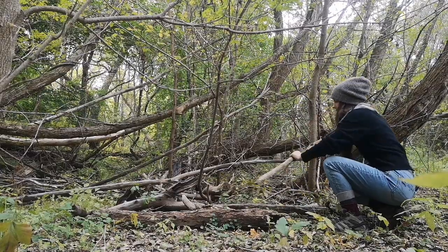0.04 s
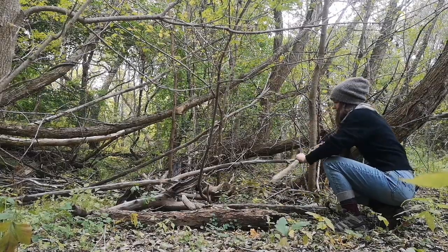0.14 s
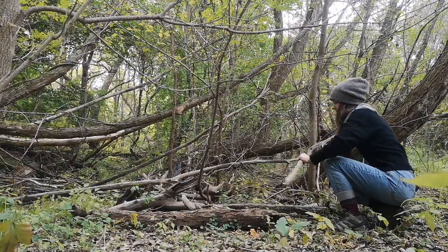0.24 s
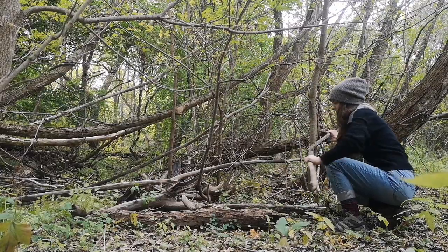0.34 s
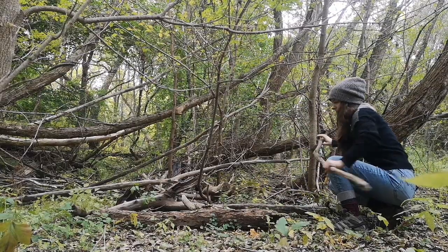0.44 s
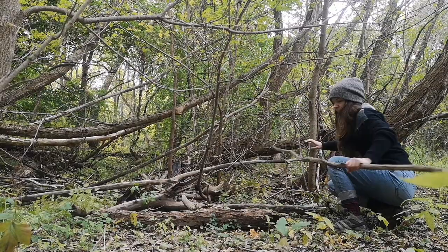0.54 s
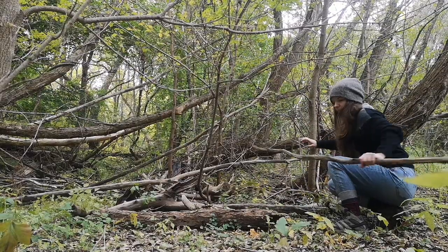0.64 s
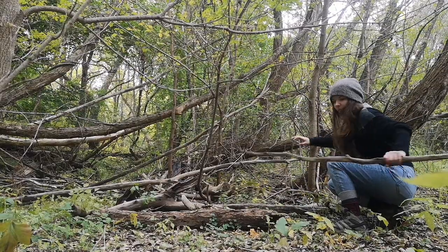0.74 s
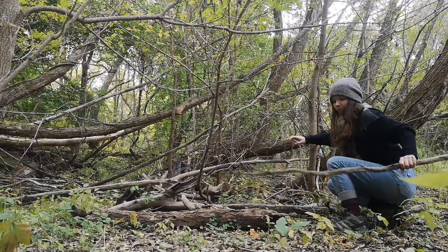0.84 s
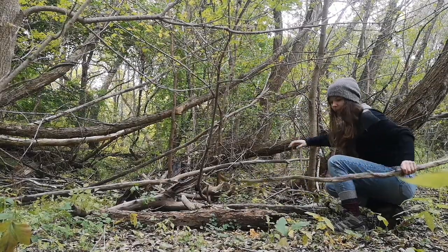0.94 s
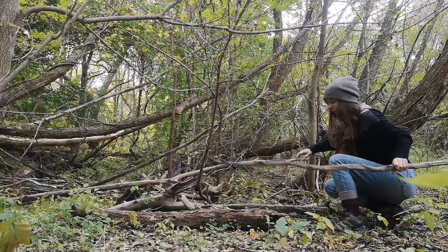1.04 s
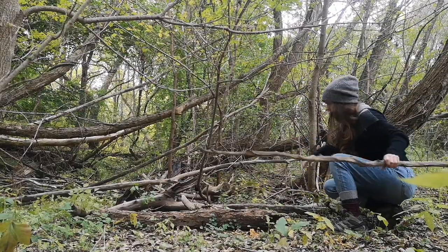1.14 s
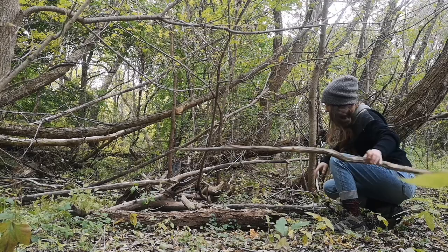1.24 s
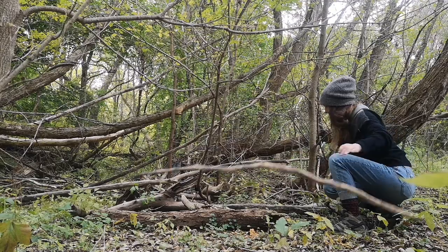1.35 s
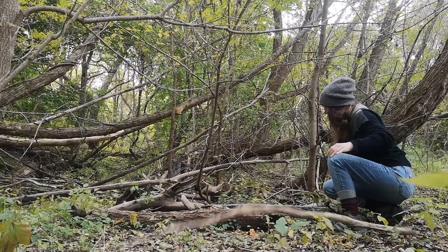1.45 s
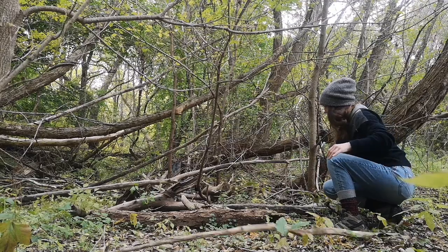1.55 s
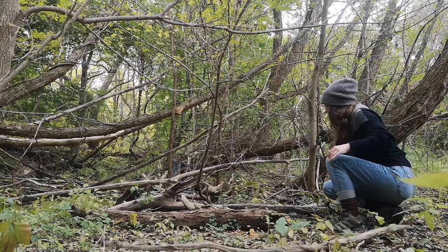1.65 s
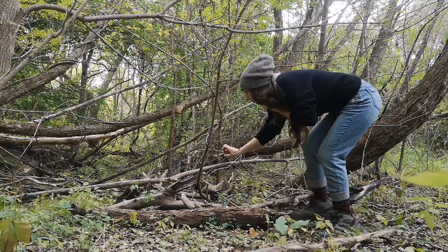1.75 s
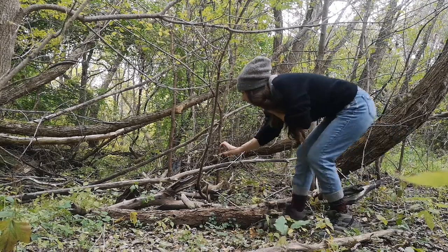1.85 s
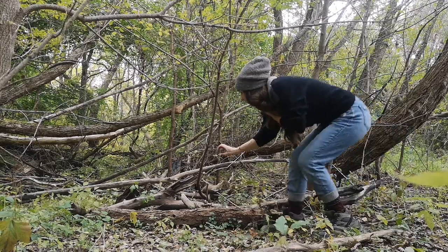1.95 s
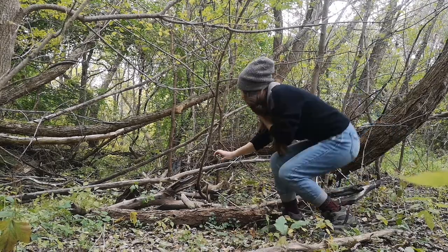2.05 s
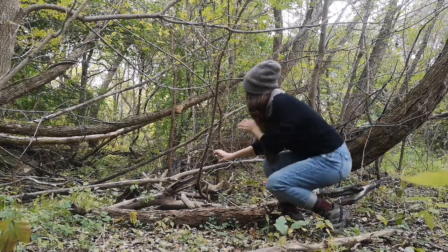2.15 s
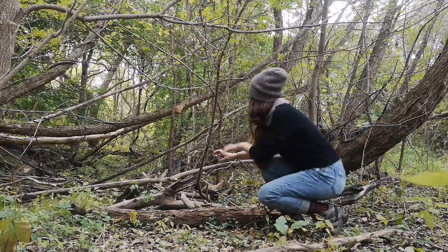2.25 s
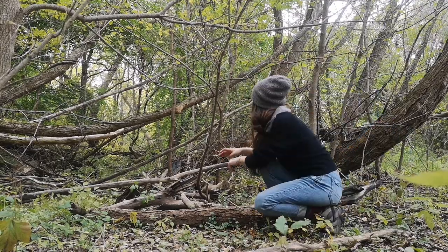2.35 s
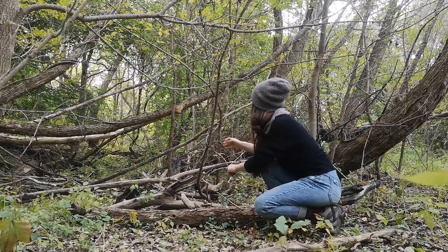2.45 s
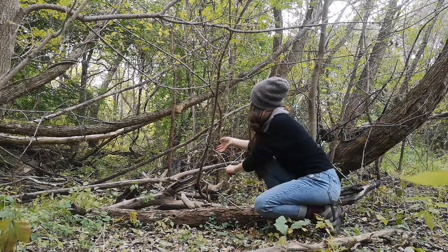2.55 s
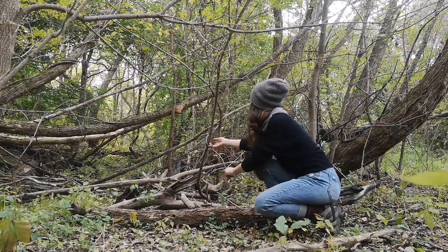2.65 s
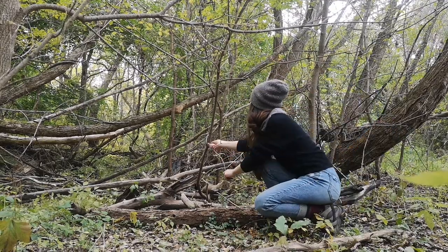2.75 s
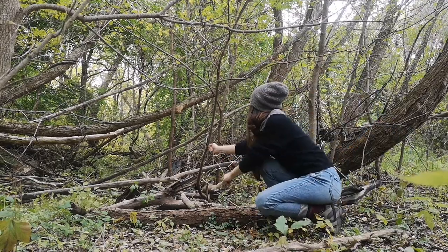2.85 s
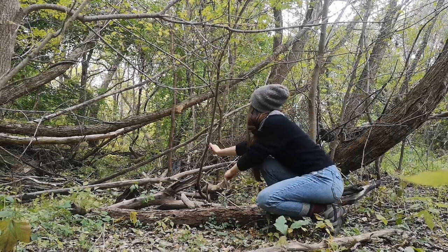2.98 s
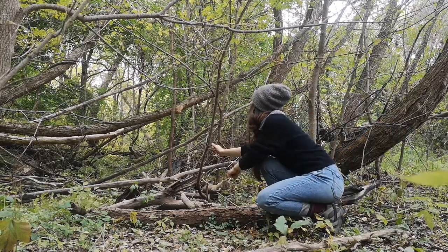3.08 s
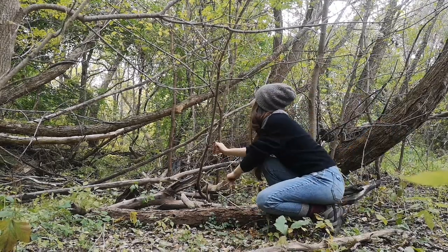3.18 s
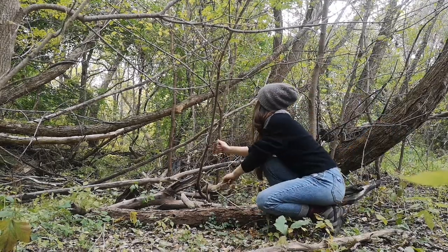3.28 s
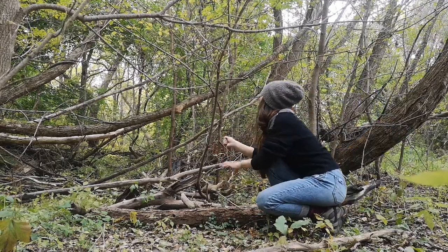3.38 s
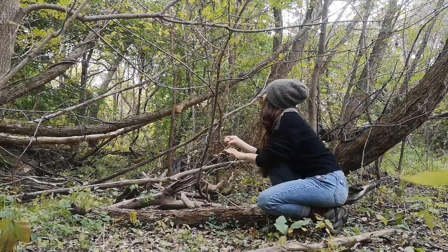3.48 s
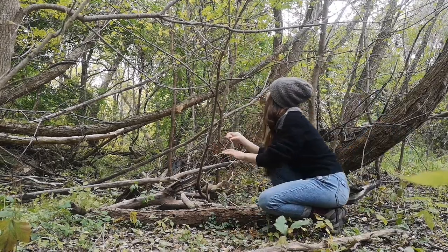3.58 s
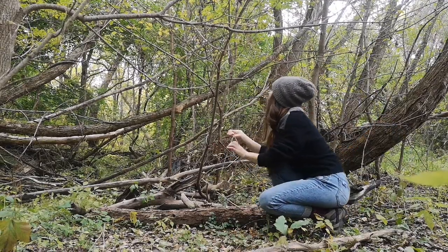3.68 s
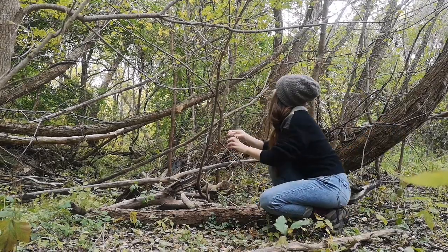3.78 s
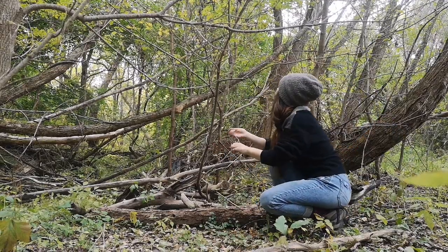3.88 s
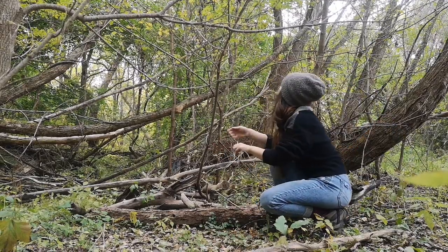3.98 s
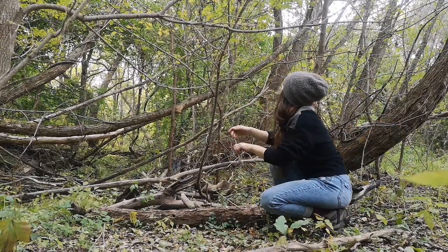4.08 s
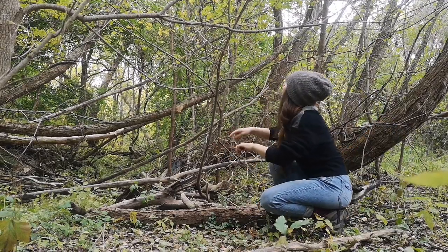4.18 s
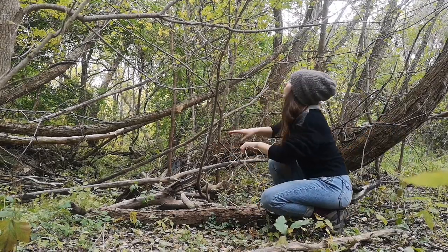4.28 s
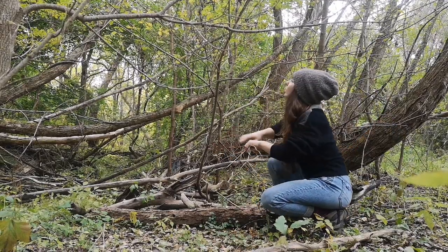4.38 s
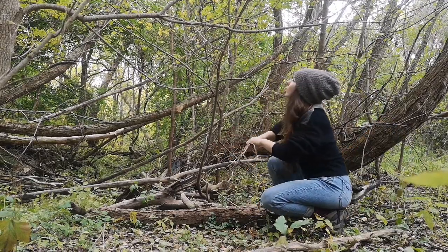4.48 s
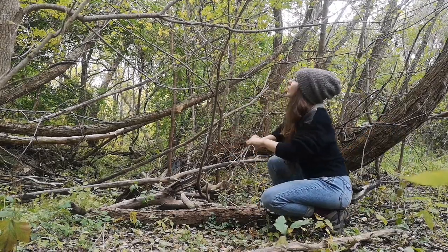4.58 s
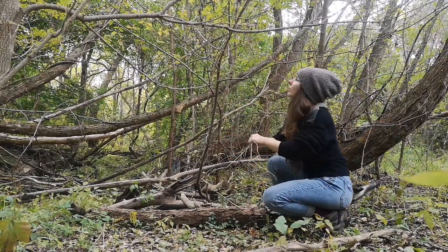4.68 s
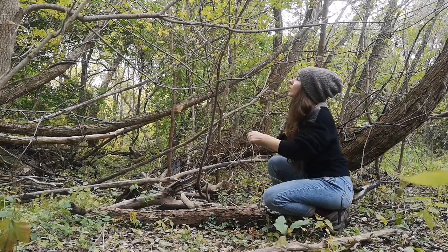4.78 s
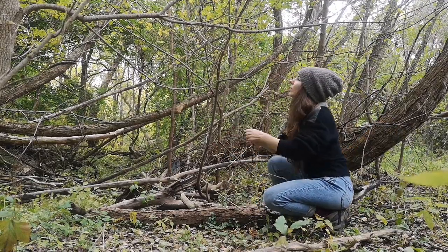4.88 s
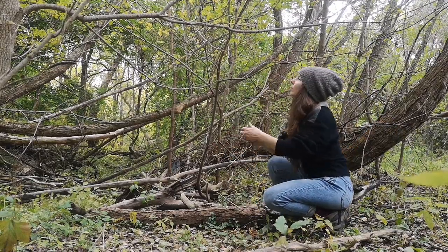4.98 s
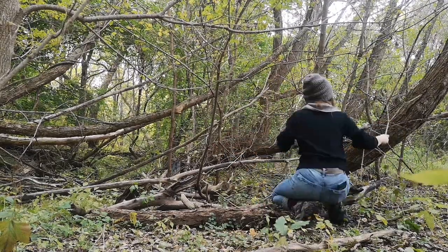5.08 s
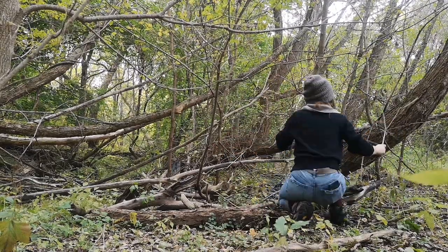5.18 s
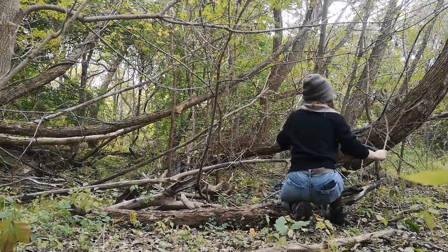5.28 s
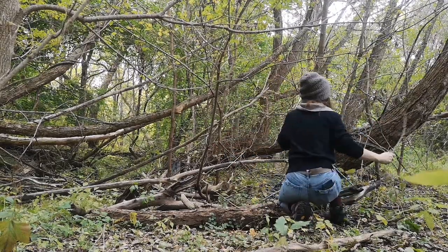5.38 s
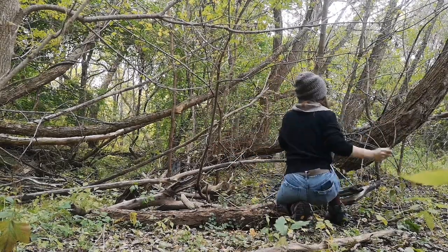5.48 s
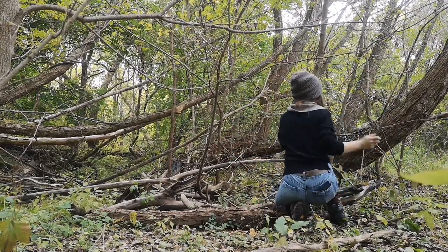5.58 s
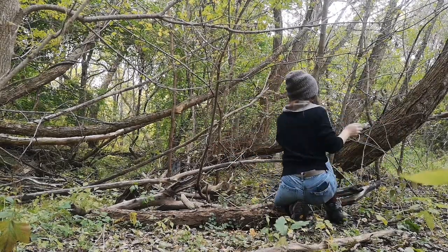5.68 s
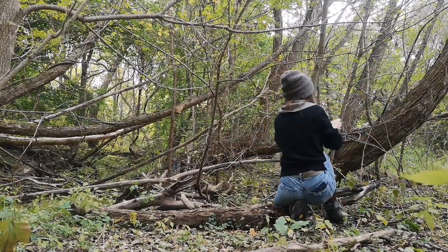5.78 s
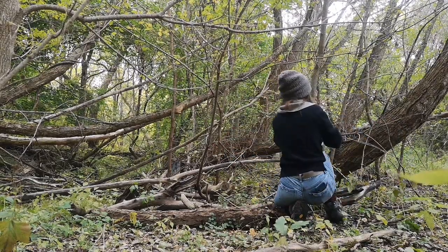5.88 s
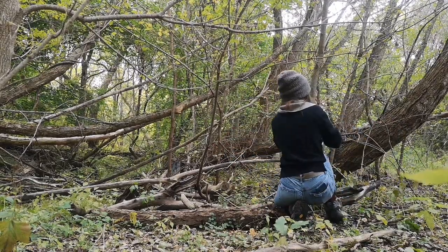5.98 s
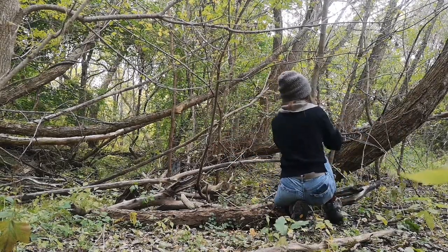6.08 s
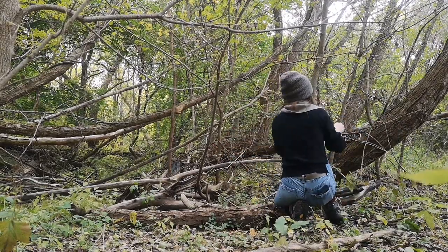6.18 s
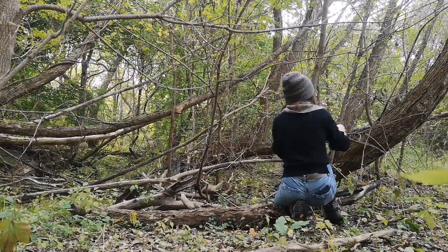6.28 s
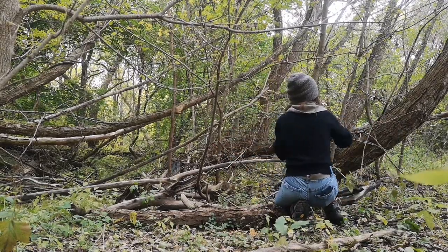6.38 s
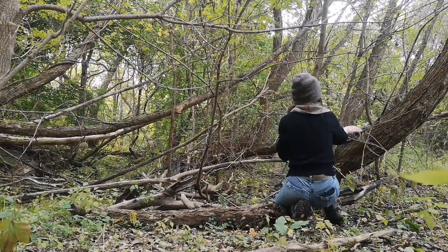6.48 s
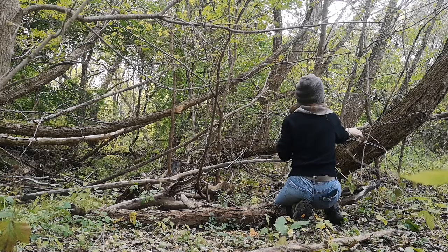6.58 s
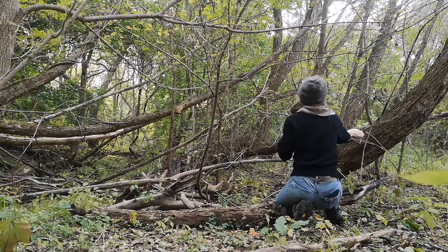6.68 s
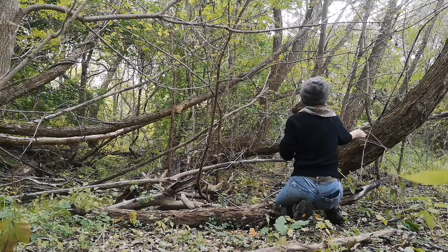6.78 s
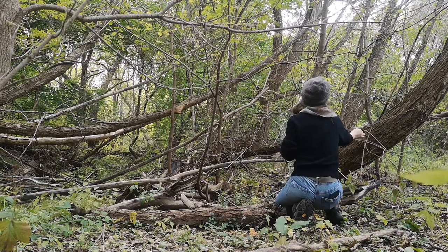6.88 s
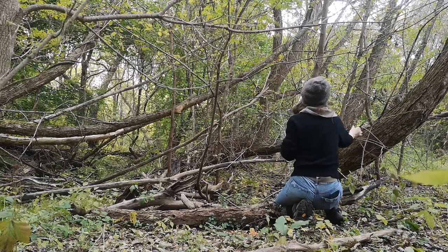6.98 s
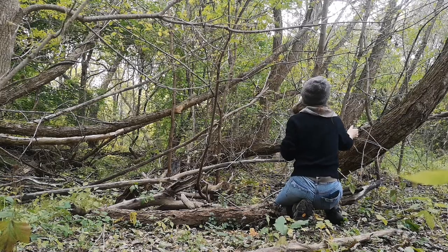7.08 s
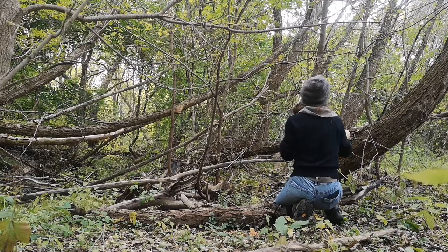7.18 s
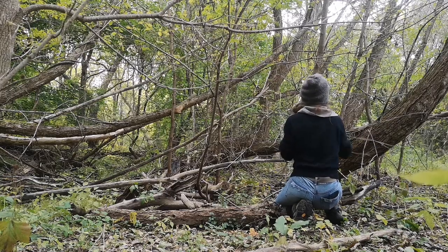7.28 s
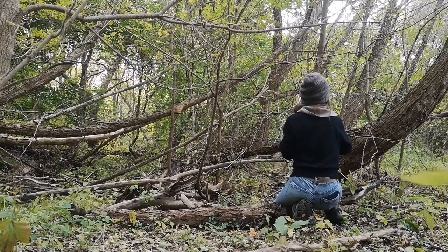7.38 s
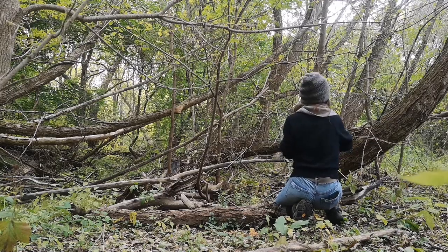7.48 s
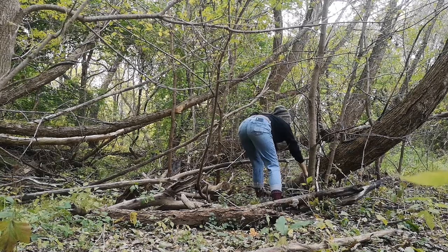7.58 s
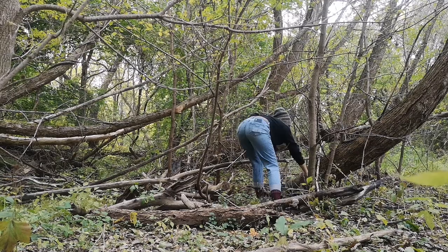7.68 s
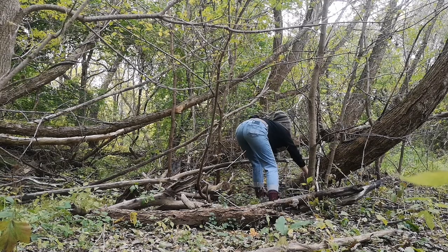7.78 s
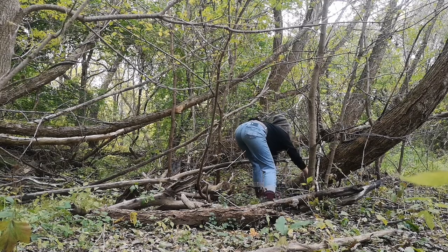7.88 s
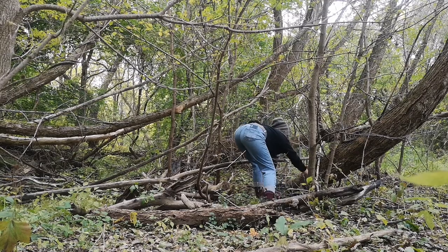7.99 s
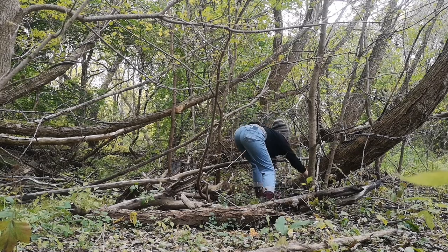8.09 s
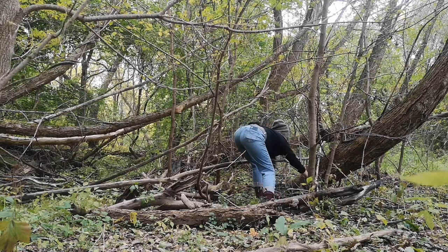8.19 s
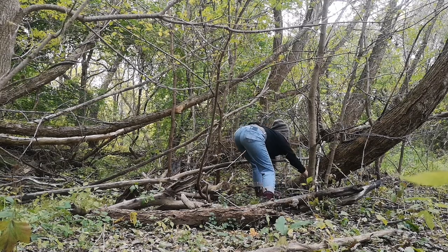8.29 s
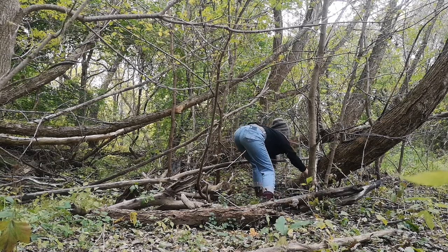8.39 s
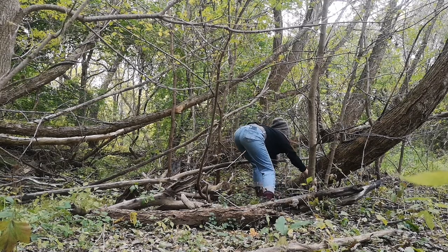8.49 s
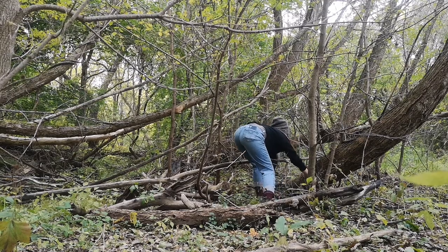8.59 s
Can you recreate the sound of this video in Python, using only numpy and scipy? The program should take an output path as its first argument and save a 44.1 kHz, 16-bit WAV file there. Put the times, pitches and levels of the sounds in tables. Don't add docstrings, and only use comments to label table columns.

```python
import sys
import numpy as np
from scipy import signal
from scipy.fft import rfft, irfft, next_fast_len
from scipy.io import wavfile
from scipy.ndimage import uniform_filter1d, map_coordinates

SR = 44100
rng = np.random.default_rng(int(sys.argv[2]) if len(sys.argv) > 2 else 0)


def gain_from_db(level_db):
    decades = np.asarray(level_db, float) / 20
    return 10 ** decades


def to_wav(s):
    ch = np.atleast_2d(s).T
    pcm = np.round(np.clip(ch, -1, 1) * 32767)
    wavfile.write(sys.argv[1], SR, pcm.astype(np.int16))


N = 381024
EDGE_HZ = 15320

# (start [s], end [s])
SHOTS = [
    (0, 1.729),
    (1.73, 5.028),
    (5.029, 7.55),
    (7.551, 8.64),
]
# (frequency [Hz], left over right [dB])
PORTS = [(3500, -0.5), (7000, -3.5), (10500, 0.5), (14000, 4.5)]


def unit(x):
    return x / np.sqrt(np.mean(x ** 2) + 1e-20)


def along(points, hz):
    f, v = np.transpose(points)
    return np.interp(np.log(hz + 1), np.log(f + 1), v)


def wobble(rate):
    knots = rng.standard_normal(int(N * rate / SR) + 4)
    return map_coordinates(knots, [np.arange(N) * rate / SR])


def filtered(x, response):
    m = next_fast_len(x.shape[-1] + 4096, real=True)
    return irfft(rfft(x, m) * response(np.fft.rfftfreq(m, 1 / SR)), m)[..., :x.shape[-1]]


def causal(x, spectrum):
    size = 4096
    gain = gain_from_db(along(spectrum, np.fft.rfftfreq(size, 1 / SR)))
    cepstrum = irfft(np.log(gain + 1e-4))
    cepstrum[1:size // 2] *= 2
    cepstrum[size // 2 + 1:] = 0
    kernel = irfft(np.exp(rfft(cepstrum)))[:size // 2]
    return signal.oaconvolve(x, kernel[None] / np.linalg.norm(kernel), axes=1)[:, :N]


def rush(spectrum, source):
    # (frequency [Hz], left-right likeness [-1 to 1])
    alike = [(60, 0.95), (130, 0.97), (290, 0.72), (640, 0.42), (1410, -0.42), (3100, 0.03),
             (15000, -0.074)]

    def response(hz):
        turn = np.arccos(np.clip(along(alike, hz), -1, 1)) / 2
        return (hz < EDGE_HZ) * gain_from_db(along(spectrum, hz)) * [np.cos(turn), np.sin(turn)]

    mid, side = filtered(source, response)
    return unit(np.array([mid + side, mid - side]))


def add(track, s, sound, pan_db=0, placed=True):
    left_leads = (.00014, -.00007, .00014, .00007)
    shot = np.searchsorted([end for _, end in SHOTS], s, side="right")
    keep = min(sound.shape[-1], int((SHOTS[shot][1] - s) * SR) - 20)
    stereo = np.broadcast_to(sound, (2, sound.shape[-1]))
    for port, side in enumerate((1, -1)):
        at = max(round((s - placed * side * left_leads[shot] / 2) * SR), 0)
        track[port, at:at + keep] += stereo[port, :keep] * gain_from_db(side * pan_db / 2)


def backdrop(axis):
    # (rumble [dB], tyre roar [dB], stirring leaves [dB], microphone hiss [dB], whine [dB])
    levels = [(-44.5, -53, -61, -64.5, -73), (-55, -64.5, -71, -75.5, -91), (-53, -61, -66.5, -67, -89),
              (-50.5, -61, -64, -67.5, -91)]
    shot = np.searchsorted([end for _, end in SHOTS[:-1]], np.arange(N) / SR)
    return np.transpose(levels)[axis][shot]


def road():
    # (time [s], level [dB])
    traffic = [(0, 0), (1.3, -1), (1.72, 0.5), (1.76, 0), (2.45, 0), (2.62, -4), (2.95, 1), (3.5, -1.6),
               (4.6, -1.5), (5.1, 1), (5.46, -1.5), (5.8, 1.8), (6.54, -0.7), (6.84, 1.2), (7.2, -0.2),
               (8.64, -1.5)]
    # (frequency [Hz], density [dB per Hz])
    rumble = [(8.8, -37.5), (15, -22), (32, -2.5), (45, -9), (65, -1), (222, -13.5), (276, -20.5),
              (308, -22.5), (400, -25.5), (520, -44.5), (880, -120)]
    # (frequency [Hz], density [dB per Hz])
    roar = [(150, -82), (250, -10), (322, -12), (455, -10.5), (884, -8), (1840, -14.5), (2070, -16),
            (4720, -23.5), (6000, -23), (7800, -35), (13200, -120)]
    # (start [s], end [s], first pitch [Hz], last pitch [Hz], level [dB])
    engines = [
        (0, 0.31, 59.6, 60.5, -47.5),
        (.42, 1.008, 60, 58.6, -48),
        (.94, 1.515, 233.5, 217, -60),
        (6.339, 7.55, 60.65, 60.9, -58.5),
        (6.851, 7.4, 91.1, 91.8, -56),
        (7.55, 8.61, 110.1, 119.9, -55.5),
        (7.8, 8.12, 203.4, 208.5, -61.5),
        (8.3, 8.647, 198.7, 199.5, -66),
        (8.099, 8.657, 286, 299.4, -66.5),
    ]
    swell_db = np.interp(np.arange(N) / SR, *np.transpose(traffic))
    rumble_db = backdrop(axis=0) + swell_db + 0.94 * wobble(4.01)
    roar_db = backdrop(axis=1) + 0.34 * swell_db + 0.28 * wobble(7.5)
    sound = gain_from_db(rumble_db) * rush(rumble, rng.standard_normal((2, N)))
    sound += gain_from_db(roar_db) * rush(roar, rng.standard_normal((2, N)))
    for start, end, first_hz, last_hz, db in engines:
        t = np.arange(0, end - start, 1 / SR)
        fade = np.clip(np.minimum(t, t[-1] - t) / .06, 0, 1)
        drift = np.interp(t, np.arange(90) / 9, rng.standard_normal(90))
        swell = np.interp(t, np.arange(90) / 8, rng.standard_normal(90))
        pitch_hz = first_hz + (last_hz - first_hz) * t / t[-1] + 2.42 * drift
        tone = np.sin(2 * np.pi * np.cumsum(pitch_hz) / SR)
        add(sound, start, fade * gain_from_db(db + 5.0 + 1.4 * swell) * tone)
    return sound


def patches(depth_db):
    crackle = rng.standard_normal((2, N)) * gain_from_db(0.64 * rng.exponential(size=(2, N)))
    z = signal.stft(crackle, nperseg=256)[2]
    field = uniform_filter1d(rng.standard_normal(z.shape[1:]), size=9, axis=0)
    field = uniform_filter1d(field, size=7, axis=1)
    return signal.istft(z * gain_from_db(depth_db * unit(field)), nperseg=256)[1][:, :N]


def flurries(rows, floor_db):
    db = np.zeros(N) + floor_db
    for s, peak_db, rise, hold, fall in rows:
        shot = [shot for shot in SHOTS if shot[0] <= s][-1]
        start, end = [round(edge * SR) for edge in shot]
        t = np.arange(start, min(end, N)) / SR
        below = np.maximum(np.maximum((s - t) / rise, (t - s - hold) / fall), 0)
        db[start:end] = np.maximum(db[start:end], peak_db - 20 * below)
    return db


def leaves():
    # (time [s], level [dB], rise [s], hold [s], fall [s])
    rustle = [(.24, -55, 0.73, 0.0068, 0.08), (.33, -53.5, .012, .01, 1.1), (.72, -53.5, .03, 0.071, 0.88),
              (1.24, -58.5, .04, 0.0085, .9), (1.445, -44, 0.0046, 0.06, 0.032),
              (1.646, -38, 0.15, .01, 0.14), (1.804, -51.5, 0.14, .12, 0.12), (2.15, -67.5, .1, 0.012, 2.4),
              (2.924, -55.5, 0.11, .01, 0.46), (3.3, -69, .15, .11, 0.19), (3.55, -70, .1, .01, 1.5),
              (4.97, -64.5, 0.52, .01, 0.2), (5.03, -52.5, .002, 0.28, .1), (5.28, -44, .012, .005, 0.17),
              (5.5, -62.5, .06, 0.57, 0.18), (5.925, -56, .04, .03, .08), (7.231, -53, .02, .003, .04),
              (7.304, -56.5, .025, .02, .06), (6.52, -62, .05, .01, 0.59),
              (6.765, -51.5, 0.042, 0.077, .03), (6.9, -46, 0.037, .005, 0.15), (6.95, -53, .04, .005, 0.3),
              (8.2, -44, 0.064, .005, 0.16), (8.63, -58, 1.3, .01, .1)]
    # (time [s], level [dB], rise [s],
    # hold [s], fall [s])
    shifts = [(1.47, -56, .02, .02, .08), (1.585, -50, .04, 0.028, .1), (1.66, -51, .04, 0.03, .1),
              (2.872, -52, .01, .01, .12), (2.95, -59, .05, 0.024, .12), (4.786, -62, .006, .004, .012),
              (4.835, -57, .006, .01, .06), (5.032, -62, .003, .21, .15), (5.29, -55, .02, .07, 0.11),
              (5.39, -63, .03, 0.018, .04), (5.925, -60, 0.04, .02, 0.12), (6.875, -61, .01, .01, 0.087),
              (7.72, -61, 0.009, .02, .08), (8.16, -59, .01, .02, .07)]
    # (time [s], level [dB], rise [s], hold [s], fall [s])
    crash = [
        (.205, -50, .06, .018, .05),
        (1.45, -44, 0.0094, .003, 0.045),
        (1.53, -47, 0.015, .003, 0.22),
        (1.65, -41, 0.061, 0.0062, 0.4),
        (1.95, -65.5, 0.55, 0.0041, 0.037),
    ]
    # (frequency [Hz], density [dB per Hz])
    fine = [(1470, -16.5), (2500, -10.5), (2890, -11.5), (4480, -11), (5630, -9.5), (6110, -8.5), (9000, 3),
            (11500, -5), (13700, -6), (15300, -10.5)]
    # (frequency [Hz], density [dB per Hz])
    litter = [(2400, -28.5), (3600, -3.5), (4600, -4), (6200, -2.5), (8000, -9), (12000, -35)]
    # (frequency [Hz], density [dB per Hz])
    stems = [(400, -12), (800, 2), (1600, 1.5), (2800, -4), (3300, -2), (3900, -30), (6500, -26)]
    flutter_db = 1.2 * wobble(14) + 1.4 * wobble(70)
    fine_db = flurries(rustle, backdrop(axis=2)) + flutter_db
    litter_db = flurries(shifts, floor_db=-104) + flutter_db
    stems_db = flurries(crash, floor_db=-104) + flutter_db
    sound = gain_from_db(fine_db) * rush(fine, patches(depth_db=2.0)) * gain_from_db([[.6], [-.6]])
    sound += gain_from_db(litter_db) * rush(litter, patches(depth_db=2.5))
    return sound + gain_from_db(stems_db) * rush(stems, patches(depth_db=3.5))


def grain(s):
    # (time [s], girth as extra bass [dB], hollow [Hz], length of the break t60 [s])
    wood = [(.211, -6, 5900, .05), (.312, 20.5, 3900, .04), (1.447, 2, 3600, 0.031),
            (1.5174, 15, 2970, 0.045), (1.5395, 3, 3950, 0.016), (2.7288, 1, 5630, 0.01),
            (2.8599, -3, 5060, 0.018), (3.0976, -14, 4070, 0.024), (3.895, -3, 4200, 0.01),
            (4.7737, -21, 1900, 0.0043), (4.8176, -1, 6300, 0.0086), (5.2743, -5, 3200, 0.015),
            (5.9276, 8, 3730, 0.012), (6.8591, -14, 4200, 0.011), (7.7111, 3, 2830, 0.013),
            (7.8365, 0, 5850, 0.014), (8.1502, 6, 4300, 0.019)]
    for when, girth_db, hollow_hz, t60 in wood:
        if abs(when - s) < .005:
            def colour(hz):
                octaves = np.log2((hz + 1) / hollow_hz)
                return -7.5 * np.exp(-(octaves / 0.29) ** 2) + along([(810, girth_db), (1900, 0)], hz)
            return colour, max(t60, .003)
    return lambda hz: 0 * hz, .026


def twigs():
    # (time [s], peak [dB], wood body [dB], scatter [dB], thinness [dB per octave])
    snaps = [(0.2135, -46, 5, -7.5, 4), (0.312, -36, -9.5, -1, -2), (1.447, -22, -7, -8.5, -1),
             (1.5171, -21, -14, -4.5, 3), (1.54, -11.5, -10, -12.5, -3.5), (2.729, -24, -26.5, -11.5, 3),
             (2.8598, -4, -26, -18.5, -3), (3.0975, -30.5, -36, -18, -7), (3.8956, -17.5, -28.5, -14, 7),
             (4.7738, -20, -23, -13, 5), (4.8177, -5.5, -31.5, -17.5, 3),
             (5.2742, -11.5, -31.5, -13.5, 1.5), (5.927, -44, -8.5, 1, -7), (6.8594, -6.5, -27, -10, 0.5),
             (7.7112, -18.5, -25, -6, -3), (7.8366, -24, -30, -8, 2), (8.149, -13, -22.5, -4.5, -1),
             (2.9312, -36.5, -18, -5.5, -5), (1.7144, -34, -4, -12, 19), (7.944, -48.5, -7, -15, -7)]
    # (time [s], peak [dB], scatter [dB], thinness [dB per octave])
    splinters = [(1.5523, -18.5, -2.5, 0.5), (2.8709, -14, -11, 0), (4.7565, -33, -23, 7),
                 (4.787, -46, -14, 14), (1.533, -38, -8, 5), (5.2954, -28, -10, -1), (5.3522, -28, -15, 0),
                 (5.389, -42, -31, -6), (6.7435, -56, -15, 0), (6.7611, -33, -11, -3),
                 (6.8658, -15, -12, 3), (7.7376, -28, -18, 6), (7.8524, -34, -3.5, 6), (8.133, -39, -9, 0),
                 (1.4615, -27, -14, 0), (1.4675, -30, -14, 4), (1.473, -32, -14, 0), (1.527, -24, -14, 0),
                 (1.5356, -26, -16, 0), (1.567, -22, -10, 0), (1.5865, -20, -12, 2), (1.6245, -32, -14, 6),
                 (1.6333, -27, -12, 6), (1.652, -29, -12, 6), (2.9525, -45, -12, -2),
                 (2.9713, -46, -12, -2), (4.734, -56, -20, 0), (4.763, -43, -20, 5), (4.795, -41, -16, 11),
                 (4.831, -27, -16, 5), (5.0295, -50, -12, 0), (5.0547, -43, -16, -2), (5.1835, -43, -16, 0),
                 (5.1975, -45, -16, 0), (5.2205, -45, -16, 0), (7.7175, -24, -10, -7),
                 (7.723, -23, -12, -5), (7.8423, -38, -14, 6), (8.1505, -15, -10, -5),
                 (8.2217, -40, -14, 0)]
    # (time [s], peak [dB], scatter [dB], thinness [dB per octave])
    touches = [(.145, -46, -1, 0), (.465, -42, -4, -4), (.5855, -43, -24, -12), (.707, -37, -2, -4),
               (1.265, -50, 1, 6), (2.2786, -38, -14, 9), (3.305, -52.5, -1, 5), (3.3906, -46, -12, -3),
               (3.4031, -43, -6, 0), (3.815, -60, 3, 3), (4.022, -51, -15, -1), (4.1285, -53, -8.5, -2),
               (4.4933, -42.5, -9, 0), (5.676, -41, -5, 3), (5.6944, -34, -8.5, 3), (6.489, -42, -11, 4),
               (6.504, -37, -7, -3), (7.0887, -44, -7, -7), (7.1331, -36, -22, 0), (7.229, -41, -9, 0),
               (7.3046, -50, -0.5, 6), (7.5257, -46.5, -3, 5), (8.5243, -40, -9, -5)]
    # (frequency [Hz], density [dB per Hz])
    crack_colour = [(2060, -46), (3500, -14.5), (4120, -16.5), (4880, -6.5), (5560, -9), (6010, -9),
                    (6580, -4.5), (10100, 0), (15300, -13), (15600, -21), (16600, -54)]
    # (frequency [Hz], density [dB per Hz])
    body_colour = [(350, -44.5), (600, -4.5), (1870, 4), (2380, 7.5), (3600, 7), (5140, -9), (6000, -7),
                   (7800, -55.5), (13200, -120)]
    common = 0.89
    bright, body = np.zeros((2, N)), np.zeros((2, N))
    t = np.arange(SR // 4) / SR
    woods = filtered(rng.standard_normal((2, N)), lambda hz: hz < EDGE_HZ)
    late = np.maximum(t - .0011, 0)
    onset = 1 - np.exp(-late / 0.014)
    nearest_stems = (late > 0) * gain_from_db(-9.5 - 60 * t / 0.027)
    trunks = onset * (gain_from_db(-60 * t / 0.094) + gain_from_db(-18.5 - 60 * t / 0.36)) + nearest_stems
    ground = onset * gain_from_db(7.5 - 60 * t / 0.055)
    breaks = list(snaps)
    breaks += [(s, db, -26.5, scatter_db, thin_db) for s, db, scatter_db, thin_db in splinters]
    breaks += [(s, db, -22, scatter_db, thin_db) for s, db, scatter_db, thin_db in touches]
    for s, db, body_db, scatter_db, thin_db in breaks:
        colour, t60 = grain(s)
        pan_db = 2 + 0.11 * thin_db
        own, shared = rng.standard_normal((2, len(t))), rng.standard_normal(len(t))
        burst = np.where(late > 0, gain_from_db(-60 * late / t60), gain_from_db(-24.0) * t / 0.0013)
        burst = burst * gain_from_db(1.2 * rng.exponential(size=len(t)))
        fibres = burst * (0.91 * own + 0.5 * shared)
        core = burst * gain_from_db(-60 * late / 0.013) * ((1 - common) * own + common * shared)
        fibres = fibres / np.linalg.norm(fibres, axis=1, keepdims=True) * gain_from_db(12)
        core = core / np.linalg.norm(core, axis=1, keepdims=True) * gain_from_db(14)
        lumps_db = 2.6 * np.interp(t, np.arange(130) * 0.0017, rng.standard_normal(130))
        echoes = woods[:, rng.integers(N - len(t)):][:, :len(t)] * gain_from_db(scatter_db + lumps_db)

        def shade(hz):
            tilt_db = thin_db * np.log2(np.clip(hz, 3000, 16000) / 9000)
            return gain_from_db(tilt_db + colour(hz) + along(PORTS, hz) * [[.5], [-.5]])

        crack = filtered(fibres + trunks * echoes, shade)
        thump = filtered(core + ground * echoes, lambda hz: gain_from_db(colour(hz)))
        add(bright, s, gain_from_db(db - 1.5) * crack, pan_db)
        add(body, s, gain_from_db(db + body_db + 3.5) * thump, pan_db)
    return causal(bright, crack_colour) + causal(body, body_colour)


def ends():
    # (time [s], low mode level [dB], low mode [Hz], high mode level [dB], high mode [Hz])
    pieces = [(0.2148, -39, 2050, -42, 3350), (1.447, -38, 2300, -29, 5200), (1.5398, -29, 1510, -23, 2800),
              (1.517, -41, 1700, -33, 3100), (3.8959, -48, 1900, -42, 3900), (7.7108, -52, 1700, -28, 3700),
              (7.7185, -40, 2250, -44, 1750), (7.836, -54, 1600, -42, 3900), (2.8593, -37, 2100, -30, 2750),
              (5.2743, -46, 2400, -47, 3900), (2.7269, -58, 2400, -43, 3400),
              (2.8593, -37, 1800, -17.5, 3450), (4.818, -41, 2800, -44, 5800),
              (3.0975, -57, 2500, -56, 3500), (3.8959, -43, 1420, -30, 5200),
              (3.8955, -52, 1600, -35, 7700), (4.7735, -44, 3000, -38, 6900),
              (6.8593, -35, 3900, -24, 6500), (4.7733, -46, 2570, -34, 3920),
              (4.8172, -41.5, 1780, -25, 3890), (5.2743, -47, 1500, -42, 6200),
              (6.8592, -39, 1900, -24, 3100), (7.7108, -46, 2500, -34, 5260),
              (8.1498, -46, 2300, -43, 3460)]
    track, t = np.zeros((2, N + SR)), np.arange(SR // 20) / SR
    for s, low_db, low_hz, high_db, high_hz in pieces:
        phase = rng.uniform(0, 1.7, (2, 2, 1))
        low = gain_from_db(low_db - 60 * t / 0.021) * np.sin(2 * np.pi * low_hz * t + 0.57 * phase[0])
        high = gain_from_db(high_db - 60 * t / 0.0089) * np.sin(2 * np.pi * high_hz * t + phase[1])
        add(track, s + 0.001222, low * (1 - np.exp(-t / 0.0002)))
        add(track, s + 0.001216, high * (1 - np.exp(-t / 0.00016)), placed=False)
    return track[:, :N]


def thuds():
    # (time [s], peak [dB], pitch [Hz])
    pushes = [(0.318, -43.5, 376), (1.448, -46, 213), (1.52, -38.5, 260), (1.553, -45, 420),
              (1.632, -47, 420), (1.702, -49, 420), (2.874, -59, 450), (7.725, -54, 480), (8.163, -50, 420),
              (1.673, -42, 356), (1.716, -47, 400), (2.86, -51, 650), (3.108, -57, 400), (6.86, -51.5, 294),
              (7.713, -49, 332), (8.15, -37.5, 410)]
    track, t = np.zeros((2, N + SR)), np.arange(SR // 10) / SR
    for s, db, hz in pushes:
        add(track, s, gain_from_db(db + 13.0 - 60 * t / 0.01) * np.sin(2 * np.pi * hz * t))
    return track[:, :N]


def rings():
    # (time [s], level [dB], pitch [Hz])
    pieces = [(1.446, -26, 5570), (1.4477, -38, 7600), (1.4463, -37, 9320), (1.4463, -37, 12730),
              (1.5179, -32, 4740), (1.5179, -29, 9670), (1.5177, -28, 10600), (1.5179, -33, 11600),
              (1.5413, -23, 5490), (1.5407, -19, 9250), (1.5413, -32, 11300), (1.5413, -23, 12400),
              (2.7301, -43, 7500), (2.7301, -28, 9530), (2.7301, -38, 11360), (2.7301, -42, 14320),
              (2.8609, -13, 6400), (2.8612, -22, 7300), (2.8612, -21, 13000), (2.8612, -24, 14900),
              (2.8606, -12, 9300), (2.8612, -13, 11140), (3.8967, -30, 9400), (3.897, -24, 10720),
              (3.8967, -33, 13300), (3.8967, -23, 14800), (4.7578, -39, 8500), (4.7578, -48, 3300),
              (4.7578, -38, 12940), (4.7578, -40, 14860), (4.7752, -31, 8200), (4.7749, -38, 10000),
              (4.7744, -34, 11200), (4.7749, -32, 12970), (4.8192, -20, 9510), (4.8192, -19, 11000),
              (4.819, -33, 13120), (4.8192, -29, 14600), (5.275, -24, 8280), (5.2745, -32, 9600),
              (5.2755, -21, 10470), (5.2755, -19, 12900), (6.8605, -12.5, 9350), (6.86, -20, 10210),
              (6.861, -17, 11640), (6.8605, -21, 14870), (7.7123, -24, 5100), (7.7123, -20, 6900),
              (7.7127, -17, 7910), (7.7123, -25, 14000), (7.8373, -33, 8500), (7.8373, -34, 9580),
              (7.8373, -40, 11260), (7.8373, -35, 13530), (8.1516, -16, 8300), (8.1516, -33, 10030),
              (8.1516, -26, 11400), (8.1516, -30, 12400)]
    spread = 2
    track, t = np.zeros((2, N + SR)), np.arange(SR // 30) / SR
    for s, db, hz in pieces:
        start, turn = rng.uniform(-0.77, 1, 2)
        phase = np.pi * start + spread * turn * np.array([[.5], [-.5]])
        ring = gain_from_db(db - 0.5 - 60 * t / 0.0097) * np.sin(2 * np.pi * hz * t + phase)
        add(track, s, ring * (1 - np.exp(-t / 0.00016)), .4 * along(PORTS, hz), placed=False)
    return track[:, :N]


def stick():
    # (time [s], peak [dB], low modes [dB], left over right [dB])
    knocks = [
        (1.5399, -35.5, -2, -4),
        (1.638, -41, 6.5, -1),
        (1.6641, -27, -5, 0),
    ]
    # (frequency [Hz], level [dB], decay t60 [s])
    modes = [(633, -11, 0.11), (1145, -4.5, 0.15), (1280, -5, 0.12), (1504, 5.5, 0.081), (1720, -4, 0.053),
             (2110, -5.5, 0.044)]
    track, t = np.zeros((2, N + SR)), np.arange(SR // 4) / SR
    for s, db, low_db, pan_db in knocks:
        ring = np.zeros((2, len(t)))
        for hz, level, t60 in modes:
            phase = rng.uniform(0, 0.49, (2, 1))
            decay = gain_from_db(level + low_db * (hz < 1400) - 60 * t / t60)
            ring += decay * np.sin(2 * np.pi * hz * t + phase)
        add(track, s, gain_from_db(db) * ring * (1 - np.exp(-t / 0.00064)), pan_db)
    return track[:, :N]


def scene():
    far = road() * gain_from_db([[-.4], [.4]])
    return far + leaves() + twigs() + ends() + thuds() + rings() + stick()


def roll_off(x):
    return signal.sosfilt(signal.butter(12, 16860, fs=SR, output="sos"), x)


def record(dry):
    # (frequency [Hz], density [dB per Hz])
    hiss_colour = [(1180, -24), (2000, 2.5), (5620, -6.5), (9050, 0.5), (11500, -24), (14700, -23),
                   (15500, -23), (15900, -39), (16500, -44)]
    whine = gain_from_db(backdrop(axis=4)) * np.sin(2 * np.pi * 12005 * np.arange(N) / SR)
    hiss = gain_from_db(backdrop(axis=3)) * rush(hiss_colour, rng.standard_normal((2, N)))
    return roll_off(dry + whine + hiss)


dry = scene()
out = record(dry)
to_wav(out)
```